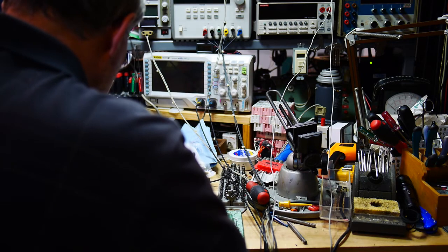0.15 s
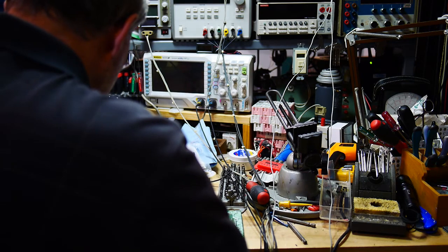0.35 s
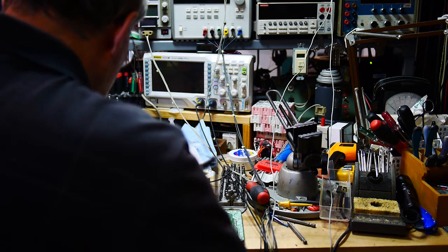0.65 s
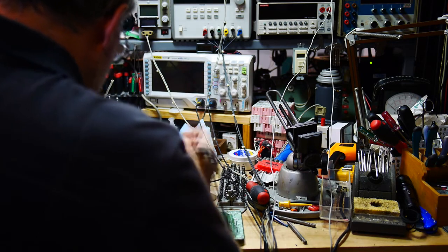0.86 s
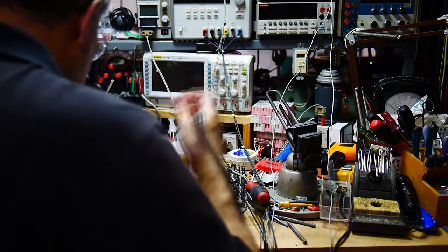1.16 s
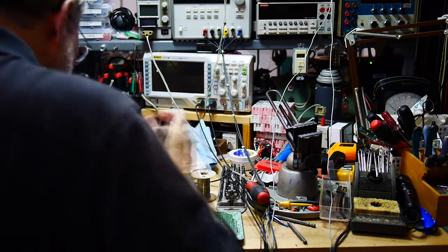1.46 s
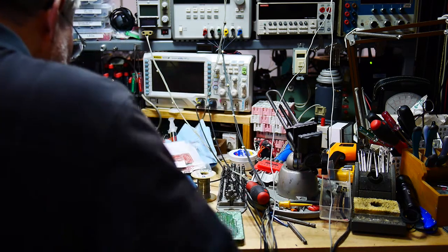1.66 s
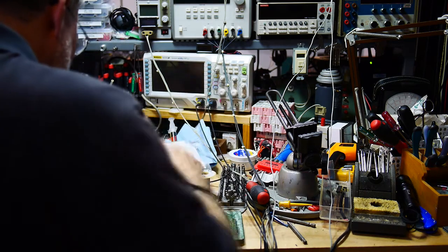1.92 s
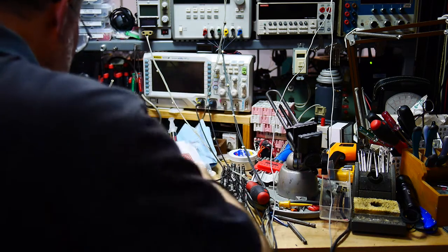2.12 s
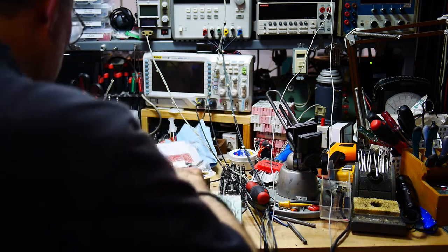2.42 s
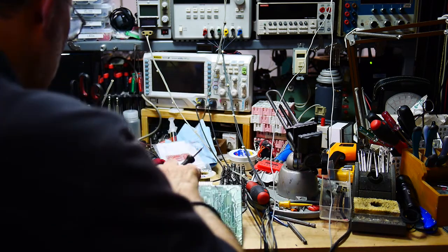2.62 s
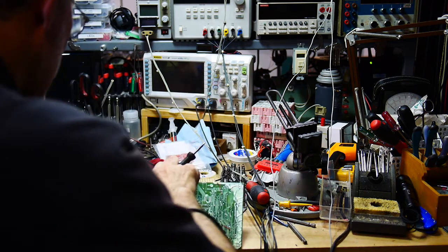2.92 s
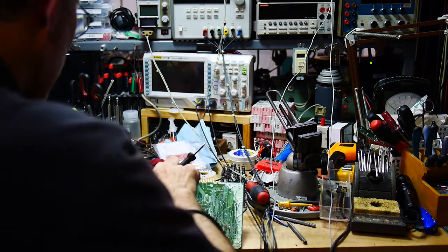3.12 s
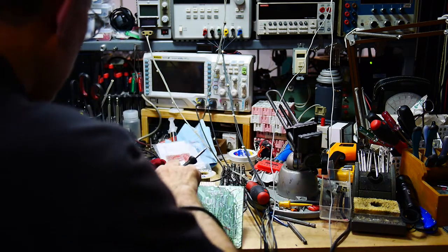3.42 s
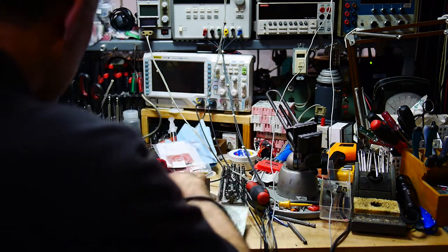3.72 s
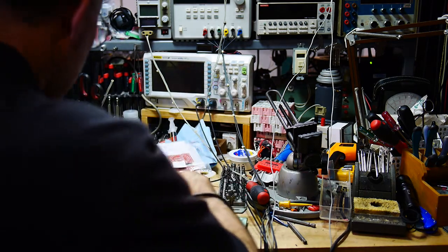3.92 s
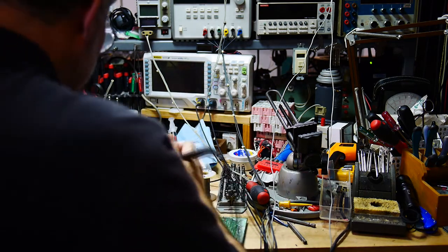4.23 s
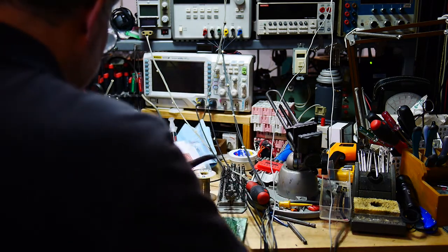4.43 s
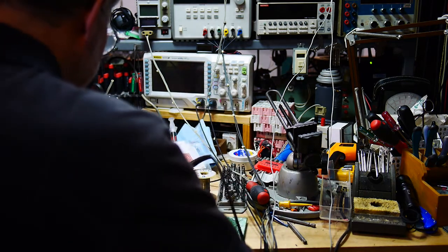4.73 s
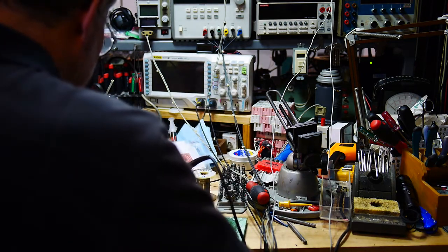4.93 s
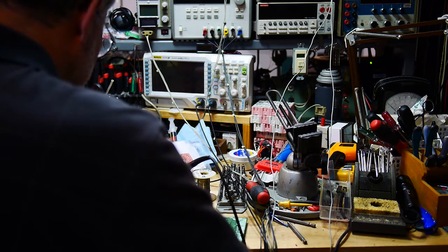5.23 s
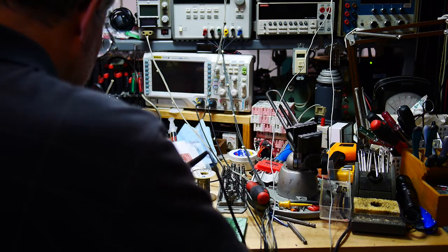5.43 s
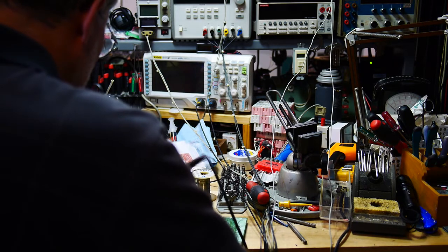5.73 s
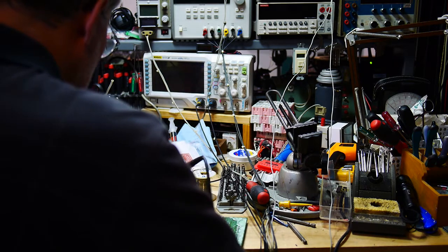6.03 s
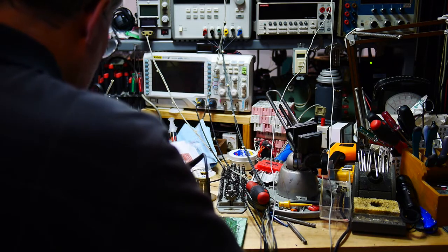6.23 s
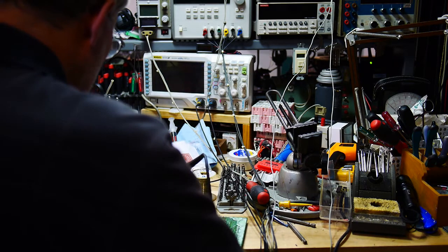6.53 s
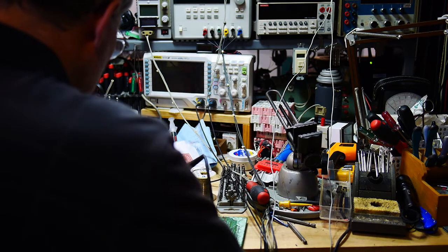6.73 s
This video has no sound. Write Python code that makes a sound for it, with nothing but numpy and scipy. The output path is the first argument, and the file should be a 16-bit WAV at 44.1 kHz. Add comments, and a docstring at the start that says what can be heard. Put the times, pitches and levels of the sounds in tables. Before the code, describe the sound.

Close stereo pickup in a small workshop with steady fan noise. A button clicks and a spring-loaded pump snaps hard. Light handling ticks follow, then the plunger rubs down and clacks into its latch. Tools and board knock and scuff on the wooden bench, a quieter stretch passes, and the pump snaps once more at the end.

```python
"""A spring-loaded desoldering pump at a workbench: the button clicks, the piston flies back and hits its stop, and the
plunger is pushed home until it latches. Each contact is a short noise burst that rings modal resonators; each rub is
coloured noise. Board and tools knock and scuff on the wooden bench, which rings wood, parts tray and board.
Instrument fans (coloured noise) and mains hum (unsteady sines) fill the small workshop; a low rumble fades away."""
import sys
import numpy as np
from scipy import signal
from scipy.fft import rfft, irfft, next_fast_len
from scipy.io import wavfile
from scipy.ndimage import map_coordinates

SR = 44100
rng = np.random.default_rng(int(sys.argv[2]) if len(sys.argv) > 2 else 0)


def master(y):
    """Save y as 16-bit WAV."""
    cut = np.clip(np.atleast_2d(y).T, -1, 1)
    pcm = np.round(cut * 32767)  # scale
    wavfile.write(sys.argv[1], SR, pcm.astype(np.int16))


N = 302550

# Pump shots: button_s, button_db, release_s, strength_db, flight_s (of the piston),
# chamber_db and spring_db (added to these rings), left_right_db
SHOTS = [(0.3084, 2.5, 0.4026, 1, .0211, -2.5, 4.5, 6.5), (6.537, 0.5, 6.6213, 0.5, .0177, 0.5, -2, 4)]


def amp(db):
    """Level definition: decibels to amplitude gain."""
    return 10 ** (np.asarray(db) / 20)


def unit(x):
    """Power normalisation: scaled to rms 1."""
    return x / np.sqrt(np.mean(x ** 2) + 1e-20)


def along(points, hz):
    """Logarithmic frequency scale: values interpolated between (hz, value) points."""
    point_hz, values = np.transpose(points)
    return np.interp(np.log(hz + 1), np.log(point_hz + 1), values)


def curves(rows):
    """Envelope interpolation: a gate open only inside the rows, then one curve for each column after the time."""
    s, *columns = np.transpose(rows)
    t = np.arange(N) / SR
    gate = np.clip(np.minimum(t - s[0], s[-1] - t) / 0.006, 0, 1)
    return [gate] + [np.interp(t, s, column) for column in columns]


def wobble(rate):
    """Random modulation: a smooth curve through normal random knots, rate of them a second."""
    knots = rng.standard_normal(int(N * rate / SR) + 4)
    return map_coordinates(knots, [np.arange(N) * rate / SR])


def filtered(x, response):
    """Linear filtering: the spectrum of x times a complex response of frequency."""
    n = x.shape[-1]
    m = next_fast_len(n + 8192)  # room for the ringing, so that it does not wrap round
    hz = np.fft.rfftfreq(m, 1 / SR)
    return irfft(rfft(x, m) * response(hz), m)[..., :n]


def body(modes):
    """Modal superposition: causal second-order resonances of alternating sign, from (hz, width_hz, level_db)."""
    def response(f):
        total = 0
        for k, (centre, width, db) in enumerate(modes):
            resonance = 1j * f * width / (centre * centre - f * f + 1j * f * width)
            total = total + (-1) ** k * amp(db) * resonance
        return total
    return response


def pair(x, spectrum, alike):
    """Interchannel coherence: two unrelated noises coloured and mixed into left and right."""
    def mid_side_gains(hz):
        angle = np.arccos(np.clip(along(alike, hz), -1, 1)) / 2
        return amp(along(spectrum, hz)) * [np.cos(angle), np.sin(angle)]
    mid, side = filtered(x, mid_side_gains)
    return np.array([mid + side, mid - side])


def heard(x, to_walls, pan_db, wet_db):
    """Reverberation and shadowing: direct sound plus a fresh noise tail decaying at its own rate in each band."""
    # Reverberation time of the workshop: frequency_hz, t60_s
    room_t60 = [(200, 0.34), (1000, 0.25), (4000, 0.29), (10000, 0.27), (13000, .22), (15500, 0.15)]
    # Coherence of the tail: frequency_hz, left_right_likeness
    tail_alike = [(300, 1), (2000, 0.93), (5000, 0.53), (10000, 0.083)]
    # Acoustic shadow of the body around the microphones on the far port: frequency_hz, share (of left_right_db)
    shadow_share = [(300, 0.5), (2000, 0), (6000, 0.57), (13000, 0.5)]
    hz, t, z = signal.stft(rng.standard_normal((2, SR // 2)), SR, nperseg=256)
    decay = amp(-60 * t / along(room_t60, hz)[:, None])
    tail = signal.istft(z * decay, SR, nperseg=256)[1]
    tail = pair(tail, [(20, 0)], tail_alike)
    tail *= np.clip(np.arange(tail.shape[1]) / SR / 0.0042, 0, 1)  # the first walls are a metre or two away
    tail /= np.linalg.norm(tail[0])
    wet = signal.fftconvolve(to_walls[None], tail, axes=1)[:, :len(x)]
    return filtered(x + amp(wet_db) * wet,
                    lambda f: amp(pan_db / 2 * along(shadow_share, f) * [[1], [-1]]))


def blows(events, parts, wet_db):
    """Impact excitation: each blow is a short rattle of noise that rings every part at its own strength."""
    out = np.zeros((2, N + SR))
    t = np.arange(SR // 2) / SR
    for s, db, levels, pan_db, length in events:
        u = t / max(length, .0003)
        rattle = u ** 1.47 * np.exp(-2.6 * u) * rng.standard_normal(len(t))
        unevenness_db = 4.1 * rng.standard_normal(len(t) // 16 + 1).repeat(16)[:len(t)]
        rattle *= amp(unevenness_db)  # uneven tiny impacts
        # the walls hear the rattle from all sides at once, which evens out its colour: one tap of the same energy
        tap = 1. * (np.arange(len(t)) == round(length * SR / 2))
        direct, even = np.zeros((2, len(t)))
        for level, part in zip(levels, parts):
            ring, smooth = filtered(np.array([rattle, tap]), part)
            ring = amp(db + level) * ring / np.abs(ring).max()
            direct = direct + ring
            even = even + smooth * np.linalg.norm(ring) / np.linalg.norm(smooth)
        start = round(s * SR)
        out[:, start:start + len(t)] += heard(direct, even, pan_db, wet_db)
    return out[:, :N]


def strokes(tables, sound, pan_db, wet_db):
    """Sliding friction: sound(levels) gated to each stroke and heard in the room."""
    out = np.zeros((2, N + SR))
    for rows in tables:
        gate, *levels = curves(rows)
        start = round(rows[0][0] * SR)
        stroke = np.pad(gate * sound(*levels), (0, SR))[start:start + SR]
        out[:, start:start + SR] += heard(stroke, stroke, pan_db, wet_db)
    return out[:, :N]


def grit(rate, depth_db):
    """Stick-slip roughness: noise broken into small slips by a random level."""
    return unit(amp(depth_db * wobble(rate)) * rng.standard_normal(N))


def workshop():
    """Stationary noise and tones: broadband fans, a slightly unsteady hum and a lumpy rumble."""
    # Colour of the fans: frequency_hz, relative_db
    fan_spectrum = [(60, -52.5), (95, -29), (125, -16.5), (155, -16), (185, -6.5), (300, -5.5), (600, -8.5),
                    (1420, -12.5), (2300, -18.5), (3500, -24), (6200, -27), (8200, -31.5), (10000, -31),
                    (13000, -39.5), (14500, -46.5), (15600, -59.5)]
    # Coherence of the fans: frequency_hz, left_right_likeness
    fan_alike = [(60, 0.79), (550, 0.63), (1650, 0.56), (4000, 0.35), (8000, 0.102), (15000, .05)]
    # Colour of the rumble: frequency_hz, relative_db
    rumble_spectrum = [(12, -47), (20, -6.5), (32, -12.5), (54, 3), (91, -2), (130, 2), (170, -11.5),
                       (290, -120)]
    # Hum tones, rms level before the wobble: frequency_hz, level_db
    hum_tones = [(60, -88), (120, -80.5), (186, -74)]
    # Slow course of the background: time_s, fans_db, fan_treble_db (relative to the fans), rumble_db
    background_course = [(0, -52.5, 4.5, -60), (1, -52.5, 4.5, -63.5), (3.2, -52, 3.5, -66),
                         (4.1, -51, 0.8, -69.5), (5, -53.5, 1, -77), (6.86, -52.5, -0.5, -86)]
    _, fans_db, hiss_db, rumble_db = curves(background_course)

    fan_lag_s = 0.00012  # the fans stand to the right and reach the left port later
    fans = unit(pair(rng.standard_normal((2, N)), fan_spectrum, fan_alike))
    fans = filtered(fans, lambda hz: np.exp(1j * np.pi * hz * fan_lag_s * np.array([[-1], [1]])))
    hiss = filtered(fans, lambda hz: 1 / (1 + (2600 / (hz + 1)) ** 4))  # treble above about 2600 Hz
    fans = amp(fans_db + 0.6 * wobble(2.8)) * (fans + (amp(hiss_db) - 1) * hiss)

    rumble = unit(pair(rng.standard_normal((2, N)), rumble_spectrum, [(40, 0.81)]))
    rumble = amp(rumble_db + 2.0 * wobble(9)) * rumble

    t = np.arange(N) / SR
    hum = 0
    for hz, db in hum_tones:
        level = np.sqrt(2) * amp(db + 3.7 * wobble(5))
        hum = hum + level * np.sin(2 * np.pi * hz * t + 0.31 * wobble(8.6))
    return fans + rumble + hum


def pump():
    """Modal impacts and friction: contacts ring barrel, air chamber, rod and spring; the seal rubs the wall."""
    # Resonances of each part: frequency_hz, width_hz, relative_db
    barrel_modes = [(403, 265, -0.5), (886, 246, 5), (1243, 560, -3.5)]
    chamber_modes = [(2030, 380, -2), (2440, 340, 9.5), (2890, 810, 4.5), (3180, 80, -14)]
    rod_modes = [(4070, 200, -10.5), (5090, 100, 3), (5856, 200, 1), (6600, 220, 0), (14040, 420, -7)]
    spring_modes = [(9100, 328, -5.5), (9650, 200, 4.5)]
    # Colour of the bare contact: frequency_hz, relative_db
    crack_spectrum = [(100, -33.5), (400, -25.5), (1500, -2.5), (7000, -2), (12500, -5), (14500, -19),
                      (16000, -28)]
    # Colour of the seal rubbing the wall: frequency_hz, relative_db
    rub_spectrum = [(150, -46.5), (250, -9.5), (474, -11), (897, -0.5), (1380, -15), (1990, -8), (3510, -5),
                    (6000, -2), (7770, -7.5), (13300, -10), (15500, -32)]
    # How each contact of a shot rings the parts, before the shot's own levels:
    # crack_db, barrel_db, chamber_db, rod_db, spring_db, rattle_s
    button_contact = (-29.5, -44.5, -32.5, -31, -45.5, .009)
    release_contact = (-20.5, -18.5, -15, -25, -32, .011)
    stop_contact = (-17, -19, -14.5, -26, -29, .004)
    slap_contact = (-27, -30.5, -18, -35, -15.5, .0012)
    rebound_contact = (-26, -32, -41, -42, -36, .003)
    # Plunger rod on the barrel, relative to the event: crack_db, barrel_db, chamber_db, rod_db, spring_db
    rod_hit = (-1.5, -9.5, -9.5, -3.5, -13)
    # Soft tick of the handled pump, relative to the event: crack_db, barrel_db, chamber_db, rod_db, spring_db
    soft_tick = (-5, 2.5, 1, -3.5, -24)
    # Gain of each part for a dB of hardness: crack, barrel, chamber, rod, spring [dB per dB]
    tick_hardening = (0.29, -2, 0.05, 1, .3)
    # Rod strikes while the pump is cocked and emptied:
    # time_s, level_db, barrel_db and chamber_db (added to these rings), left_right_db, rattle_s
    cocking_hits = [(1.493, -27, 13.5, 9.5, -1, 0.0034), (1.497, -23, 2.5, -3, 9, .004),
                    (1.622, -5, -8.5, 1.5, 12.5, .0006), (1.625, -4.5, -6.5, -5.5, -3, .003),
                    (1.637, -26.5, -1, -1.5, -6.5, .004), (1.779, -17, -0.5, 5, 6, .008)]
    # Ticks of the handled pump: time_s, level_db, hardness_db, left_right_db
    handling_ticks = [(0.634, -43, 0.5, 0), (0.694, -37.5, -1, 3), (2.008, -42, 2, 4),
                      (4.2604, -56, 15, 12), (6.3653, -54.5, -3, 4)]
    # Plunger pushed by hand, rms levels: start_s, loudest_s, end_s, loudest_db, start_db, end_db
    hand_pushes = [(0.606, .63, 0.71, -60, -54, -61.5), (1.44, 1.493, 1.59, -37.5, -72.5, -52.5),
                   (1.599, 1.616, 1.622, -35.5, -45, -29.5), (1.79, 1.832, 1.915, -31.5, -39.5, -39.5)]

    parts = [lambda hz: amp(along(crack_spectrum, hz))]
    parts += [body(modes) for modes in (barrel_modes, chamber_modes, rod_modes, spring_modes)]
    slap_s, rebound_s = .008, 0.029  # after the stop
    flight_db, flight_tail_s = -29.5, 0.023  # the seal rubs during the flight and a little beyond
    events, slides = [], []
    for button_s, button_db, release_s, db, flight_s, chamber_db, spring_db, pan_db in SHOTS:
        stop_s = release_s + flight_s
        events.append((button_s, button_db, button_contact[:-1], pan_db, button_contact[-1]))
        contacts = ((release_s, release_contact), (stop_s, stop_contact),
                    (stop_s + slap_s, slap_contact), (stop_s + rebound_s, rebound_contact))
        for at, (*levels, rattle_s) in contacts:
            shot_levels = np.add(levels, (0, 0, chamber_db, 0, spring_db))
            events.append((at, db, shot_levels, pan_db, rattle_s))
        slides.append([(release_s, db + flight_db), (stop_s + flight_tail_s, db + flight_db)])
    for s, db, barrel_db, chamber_db, pan_db, rattle_s in cocking_hits:
        levels = np.add(rod_hit, (0, barrel_db, chamber_db, 0, 0))
        events.append((s, db, levels, pan_db, rattle_s))
    for s, db, hard_db, pan_db in handling_ticks:
        levels = soft_tick + hard_db * np.array(tick_hardening)
        events.append((s, db, levels, pan_db, .005))  # rattle length in seconds
    for start, loudest, end, db, start_db, end_db in hand_pushes:
        slides.append([(start, start_db), (loudest, db), (end, end_db)])

    seal = unit(filtered(grit(350, depth_db=1.5), lambda hz: amp(along(rub_spectrum, hz))))
    contacts = blows(events, parts, wet_db=-1.5)
    return contacts + strokes(slides, lambda db: amp(db) * seal, pan_db=5.0, wet_db=-1.5)


def recoil():
    """Reaction force: a low push through the bench legs when the piston lets go or latches."""
    # Latching push through the bench: time_s, peak_db
    latch_push = (1.4, -51)
    delay_s, recoil_db = 0.0038, -39.5  # after the release; relative to the shot's strength
    pushes = [(s + delay_s, db + recoil_db) for _, _, s, db, *_ in SHOTS] + [latch_push]
    events = [(s, db, (0,), 0, .012) for s, db in pushes]
    return blows(events, [body([(45.13, 69, -1), (161, 350, -1)])], wet_db=2)


def bench():
    """Coupled modal bodies: knocks and scuffs ring the wooden top and, brighter, a parts tray and circuit board."""
    # Resonances of each body: frequency_hz, width_hz, relative_db
    wood_modes = [(391.5, 47, 2.5), (526, 30, 6), (684, 150, 2), (890.5, 77, 4)]
    tray_modes = [(996, 38, -3), (1207, 94, -0.5), (1460, 85, -8)]
    board_modes = [(1810, 259, 1.5), (2487, 490, 0.4), (3420, 450, -4.5), (4190, 270, -3.5),
                   (6260, 730, -8)]
    # Knocks on the bench: time_s, wood_peak_db, tray_db and board_db (relative to the wood), rattle_s
    bench_knocks = [(0.691, -33.5, -4.5, -7.5, 0.0085), (0.782, -38.5, -5.5, -13, 0.006),
                    (0.928, -44, -5, -12, 0.0089), (1.544, -37.5, -22, -9, 0.0074),
                    (1.880, -27, -3.5, -2.5, 0.0079), (1.896, -39.5, 2, -3, 0.008),
                    (2.176, -18, -5, -6, .011), (2.190, -19.5, -1, -6.5, 0.0063),
                    (2.234, -26, -8, -8.5, 0.013), (2.285, -41, 1, -3, .012),
                    (3.687, -30.5, -11, -26, 0.00776), (3.893, -27, 0.5, -16, 0.01),
                    (4.013, -39, 5.5, 0.5, 0.013), (4.063, -39.5, -11, -22, 0.0091),
                    (4.183, -41.5, 1, -5.5, 0.013), (4.267, -38, -3, -4.5, .012),
                    (4.355, -41, -9, -8, 0.0085), (4.824, -44, 7.5, 7, 0.012), (5.119, -47.5, 5, 2, 0.0121),
                    (5.207, -50.5, 6, 8.5, .008)]
    # Hands and board dragged over the bench, rms level of the wood and of the board relative to it:
    # start_s, loudest_s, end_s, loudest_db, board_db
    bench_scuffs = [(0.698, 0.7, 0.97, -48, -7), (2.527, 2.675, 2.91, -49.5, -15.5),
                    (3.596, 3.635, 3.82, -42.5, -14), (3.853, 3.868, 3.98, -44.5, -11.5),
                    (4.136, 4.31, 4.55, -52.5, -26)]

    parts = [body(wood_modes), body(tray_modes), body(board_modes)]
    # a blunt contact lasts long enough to lose the treble
    blunt = [lambda hz, part=part: part(hz) / (1 + 1j * hz / 3200) ** 2 for part in parts]
    knock_pan_db = 0.6
    events = [(s, db, (0, *levels), knock_pan_db, rattle_s) for s, db, *levels, rattle_s in bench_knocks]

    wood, tray, board = (unit(filtered(grit(60, depth_db=-2.0), part)) for part in parts)

    def scuff(db, board_db):
        """Friction-driven resonance: wood, tray and board rubbed together."""
        return amp(db) * (wood + amp(-9.5) * tray + amp(board_db) * board)

    start_db, end_db = -18, -26.5  # relative to the loudest moment
    drags = []
    for start, loudest, end, db, board_db in bench_scuffs:
        drags.append([(start, db + start_db, board_db), (loudest, db, board_db), (end, db + end_db, board_db)])
    return blows(events, blunt, wet_db=-2.5) + strokes(drags, scuff, pan_db=1.65, wet_db=-1)


def scene():
    """Linear superposition: room noise, pump, recoil and bench add up."""
    return workshop() + pump() + recoil() + bench()


def record(dry):
    """Band limitation: only frequencies below 15800 Hz pass."""
    return filtered(dry, lambda hz: hz < 15800)


dry = scene()
out = record(dry)
master(out)
```